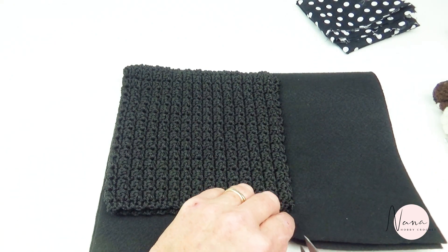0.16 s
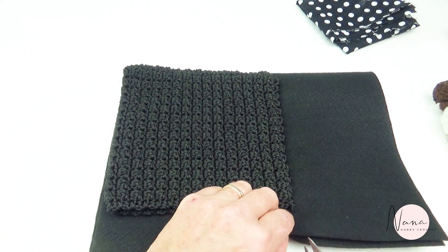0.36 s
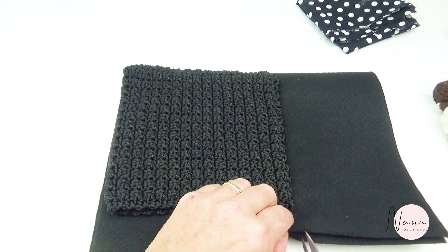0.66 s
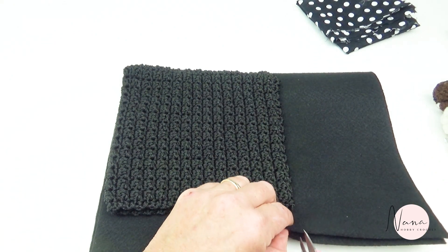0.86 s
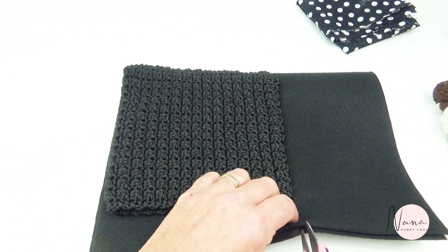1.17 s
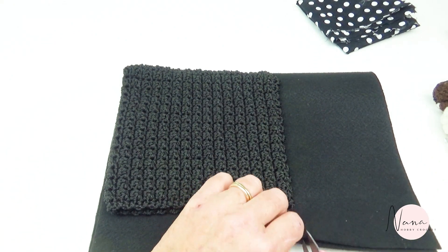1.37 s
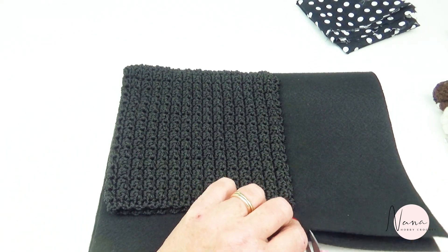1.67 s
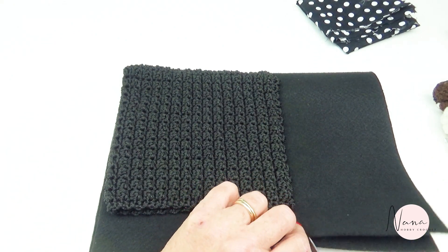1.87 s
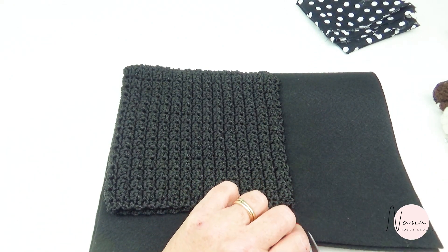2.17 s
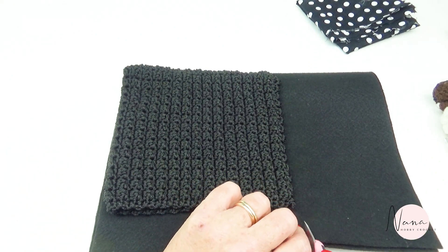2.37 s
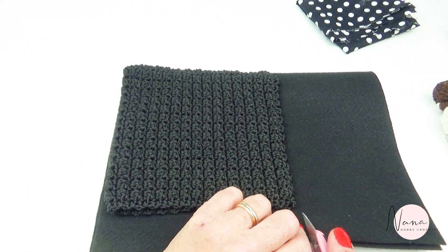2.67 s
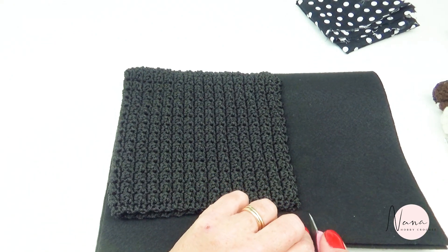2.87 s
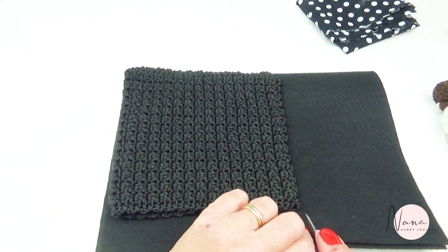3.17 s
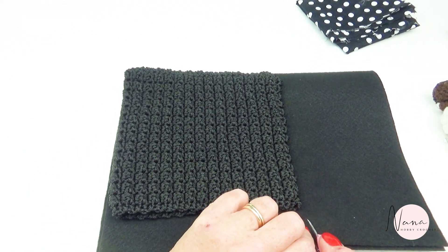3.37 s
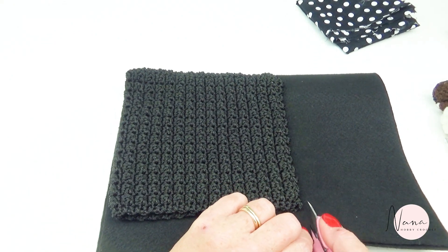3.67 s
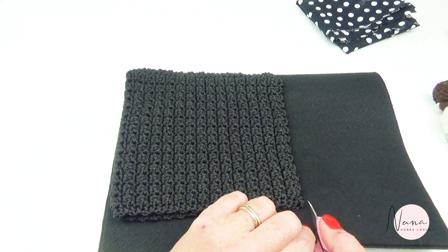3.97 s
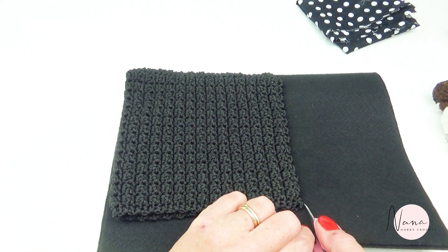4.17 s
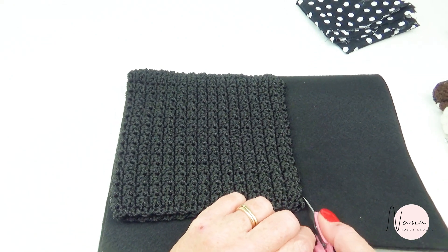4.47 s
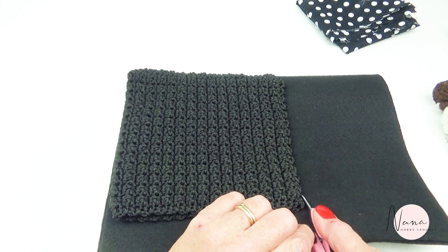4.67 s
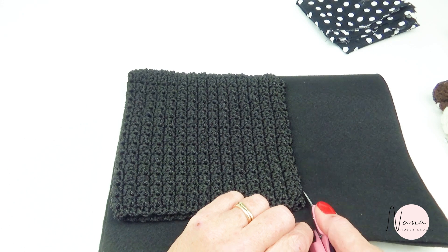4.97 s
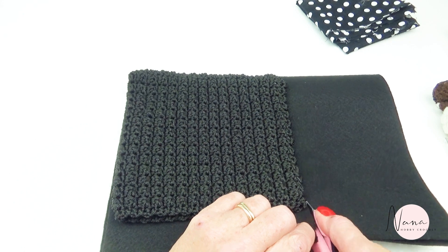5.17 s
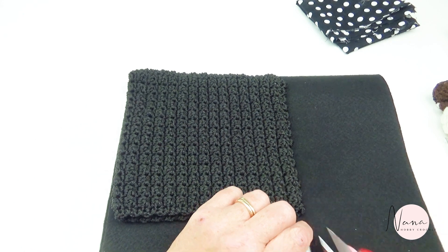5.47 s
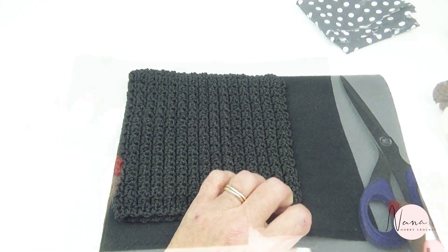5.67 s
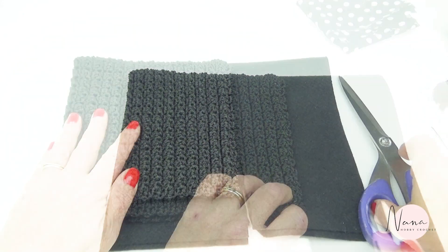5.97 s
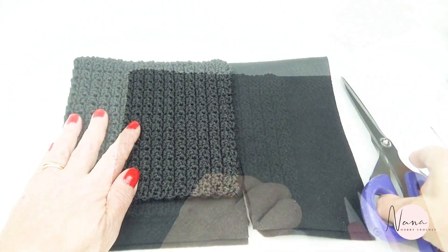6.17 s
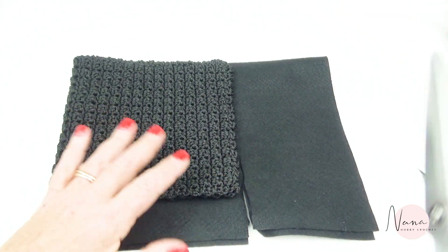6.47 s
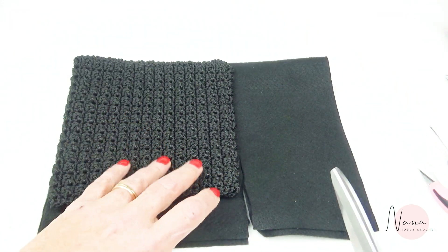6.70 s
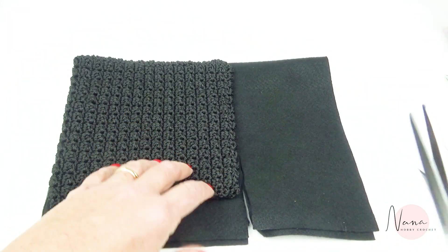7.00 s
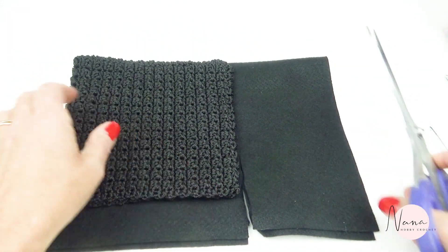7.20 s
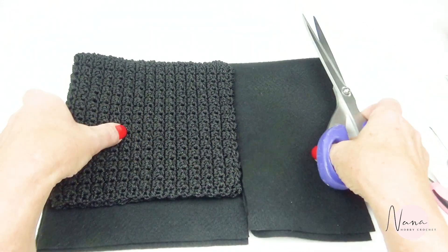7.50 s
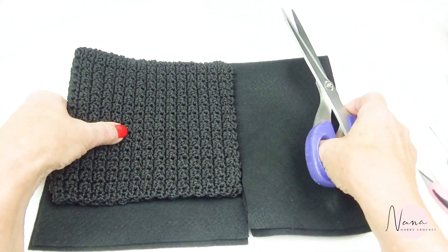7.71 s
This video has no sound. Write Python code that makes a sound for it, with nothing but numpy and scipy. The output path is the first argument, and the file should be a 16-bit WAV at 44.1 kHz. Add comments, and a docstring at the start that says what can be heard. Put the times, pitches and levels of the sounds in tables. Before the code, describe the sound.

Close to a small stereo microphone in a quiet room, scissor blades scrape and nibble faintly through doubled felt with light knocks on the table. Around three seconds the cuts turn loud and crisp, with separate bright metallic snaps until past five. Then only soft ticks, rustling cloth and low bumps remain, before the felt is dragged over the table with a cluster of dull knocks.

```python
"""First a scrape of scissor blades and a light knock on a craft table, close to a small stereo microphone
in a quiet room. Scissors nibble through doubled felt: bursts of snapping fibres ring the blade modes and
strokes rasp along the edge, while blades grind, cloth rustles, and hands and tools knock on the table.
Later the felt drags over the table top in two passes. Sources are shaped noise driving damped resonances,
over a low murmur, mains hum made of sines, a short echo and room tone."""
import sys
import numpy as np
from scipy import signal
from scipy.fft import rfft, irfft, next_fast_len
from scipy.io import wavfile
from scipy.ndimage import uniform_filter1d

SR = 44100
rng = np.random.default_rng(int(sys.argv[2]) if len(sys.argv) > 2 else 0)


def wav_out(sig):
    """Save sig, one row per channel (or a flat mono array), as 16-bit PCM at SR to the path in sys.argv[1]."""
    wavfile.write(sys.argv[1], SR, np.round(np.clip(np.atleast_2d(sig).T, -1, 1) * 32767).astype(np.int16))


N = 345964  # samples

# resonances of the scissors: (frequency [Hz], width before broadening [Hz])
BLADE_MODES = [(1150, 280), (1800, 550), (2550, 250), (2850, 220), (3250, 300), (3700, 400), (4250, 240),
               (4580, 330), (5150, 400), (6000, 550), (6900, 500), (7800, 600), (8650, 450), (9800, 1200),
               (12000, 3000)]
# level of each scissors mode when scraped: [dB]
SCRAPED_DB = [-6, -9.5, -7, -4, -9, -9.5, -2.5, -5.5, -9, -10, -12.5, -15, -10.5, -19, -29]
# where the scissors are: (time [s], left minus right [dB])
SCISSORS_SIDE = [(0, -2), (2.6, -1.6), (3.3, -0.8), (4.8, -1.2), (5.5, -2.5), (6.1, -3), (7.84, -6)]
# scraping strokes through the cloth: (start [s], length [s], level of the middle modes [dB])
CUT_STROKES = [(0, 0.065, -64.5), (0.225, 0.07, -58), (0.509, 0.16, -68), (0.687, 0.028, -59),
               (0.87, 0.037, -67), (0.937, 0.088, -63.5), (1.474, 0.05, -58.5), (1.716, 0.076, -67),
               (1.792, 0.042, -60.5), (1.882, 0.087, -68), (1.956, 0.037, -52), (2.167, 0.053, -63.6),
               (2.254, 0.044, -68.5), (2.429, 0.18, -65.5), (2.751, 0.2, -67), (3.057, 0.11, -79),
               (3.171, 0.047, -70), (3.48, 0.032, -41), (3.574, 0.13, -56.5), (3.859, 0.067, -67.5),
               (4.137, 0.081, -55), (4.463, 0.038, -53.5), (4.628, 0.071, -60), (4.772, 0.07, -64),
               (4.981, 0.15, -65), (5.498, 0.0282, -65), (5.596, 0.04, -59), (5.636, 0.077, -61.5),
               (5.722, 0.13, -66.5), (6.08, 0.059, -64.5), (6.159, 0.057, -69), (6.305, 0.02, -68.5),
               (6.401, 0.05, -73), (6.596, 0.043, -74.5), (6.657, 0.1, -79.5), (6.823, 0.066, -62),
               (6.898, 0.036, -71), (7.037, 0.039, -73)]
# resonances of the table top: (frequency [Hz], width before broadening [Hz], relative level [dB])
TABLE_MODES = [(138, 41, -9), (321, 79, -5), (431, 45, 1.5), (518, 38, 2.5), (616, 55, 0), (785, 134, -1),
               (1053, 430, 1), (1286, 470, 4), (1980, 620, -6.5), (224, 18, -5)]


def undb(db):
    """Decibels to gain."""
    return 10 ** (np.asarray(db) / 20)


def level(x, db):
    """Scale to an rms level."""
    return x * undb(db) / np.sqrt(np.mean(x ** 2))


def ring(x, hz, width_hz, gain, order=1):
    """Pass a signal through damped resonances of alternating sign; order 2 keeps the valleys dark."""
    size = next_fast_len(len(x), real=True)
    f = np.fft.rfftfreq(size, 1 / SR)[1:]
    response = 0
    for k, (centre, width, g) in enumerate(zip(hz, width_hz, gain)):
        detuning = (f ** 2 - centre ** 2) / (f * width)
        response = response + (-1) ** k * g / (1 + 1j * detuning) ** order
    return irfft(rfft(x, size) * np.append(0, response), size)[:len(x)]


def colour(x, points):
    """Shape noise by (Hz, gain) points."""
    hz, gain = np.transpose(points)
    size = next_fast_len(len(x), real=True)
    f = np.fft.rfftfreq(size, 1 / SR)
    response = np.interp(np.log(f + 1), np.log(hz), gain)
    return irfft(rfft(x, size) * response, size)[:len(x)]


def curve(table):
    """Columns of a level table, one value a sample; -150 dB outside it."""
    times, *columns = np.transpose(table)
    return [np.interp(np.arange(N) / SR, times, c, left=-150, right=-150) for c in columns]


def at(table, s):
    """Columns of a control table at one moment."""
    times, *columns = np.transpose(table)
    return np.array([np.interp(s, times, c) for c in columns])


def grit(size, scatter_db):
    """Noise whose samples differ widely in size: many faint slips, a few sharp ones."""
    boost_db = scatter_db * np.minimum(rng.exponential(size=size), 5)
    return rng.standard_normal(size) * undb(boost_db)


def walk(rate):
    """Random wander around 0, taking about rate new values a second."""
    k = int(SR / rate)
    steps = np.repeat(rng.standard_normal(N // k + 1), k)
    return uniform_filter1d(steps, k)[:N]


def sides(pan_db):
    """Left and right level offsets in dB for a left-minus-right difference."""
    return np.array([[pan_db], [-pan_db]]) / 2


def add(out, s, sound, peak_db, pan_db):
    """Place a sound with its peak level and side."""
    i = int(s * SR)
    part = sound[:N - i] * undb(peak_db) / np.abs(sound).max()
    out[:, i:i + len(part)] += part * undb(sides(pan_db))


def push(rise_ms, size):
    """Force that swells for rise_ms and dies away."""
    u = np.arange(size) / SR / (rise_ms / 1000)
    return u * np.exp(1 - u)


def near(hz, centre_hz, boost_db, octaves):
    """Favour the modes around one pitch."""
    return boost_db * np.exp(-(np.log2(hz / centre_hz) / octaves) ** 2)


def gate(s, length_s, edge_s, part=slice(None)):
    """Smooth on and off, one value a sample."""
    t = np.arange(N)[part] / SR
    inside_s = np.minimum(t - s, s + length_s - t)
    return np.sin(np.pi / 2 * np.clip(inside_s / edge_s + .5, 0, 1)) ** 2


def snips():
    """Snaps ring the blades; each burst favours one ring pitch, with a little random scatter of the modes."""
    # bursts that ring the blades: mostly snapping fibres, some where the scissors touch the table or clack
    # together: # (time [s], peak before the bass cut [dB], favoured ring [Hz], treble before a shared offset
    # [dB], # swell before scaling [ms], fade before scaling [ms])
    bursts = [(0.2276, -43.5, 4360, -6, 2.8, 3.0), (0.2808, -39.5, 4530, -7, 2, 11),
              (0.4077, -48, 2450, -10, 2.7, 2.9), (0.511, -49, 4300, -23, 2.2, 2.9),
              (0.733, -37.5, 8900, -9.5, 0.84, 1.9), (0.7402, -39.5, 2900, -8, 3.4, 6.7),
              (0.8505, -40.5, 3020, -20, 1.1, 3.9), (0.971, -45, 4520, -19, 2.9, 5.5),
              (1.069, -47.5, 4350, -5, 1.5, 5.0), (1.1352, -43.5, 2560, -19, 3.6, 5),
              (1.193, -39.5, 4460, -3.5, 1.3, 8.1), (1.2818, -48, 2560, -23, 1.2, 2),
              (1.5085, -44, 4840, -9, 7.8, 14), (1.942, -41.5, 4420, -9, 1.5, 4.5),
              (1.9858, -32.5, 4420, -3, 1.4, 1.2), (2.2036, -39, 3700, -9, 1.1, 2.3),
              (2.2097, -43, 3810, -12, 1.5, 3.8), (2.3096, -41.5, 3060, -22, 2.3, 11),
              (2.509, -38, 4230, -6, 1.9, 3.7), (2.6262, -42.5, 4330, -7, 1.55, 1.6),
              (2.8304, -35.5, 5800, -10, 1.4, 0.74), (2.862, -37, 2820, 0, 0.83, 1.1),
              (2.867, -32.5, 2900, -10, 1.1, 1), (2.8778, -36.5, 2700, -1, 1.1, 1.4),
              (2.8865, -43, 2950, -6, 5.4, 3.5), (2.899, -41.5, 2860, -11, 2.2, 2.7),
              (2.9132, -19, 2710, -1, 2.3, 0.39), (2.928, -36, 8600, -8, 2.8, 1.8),
              (2.947, -46.5, 2650, -15, 2.1, 2.8), (2.98, -44.5, 2630, -9, 3.8, 2.7),
              (3.224, -47, 2650, -3, 1.5, 1.6), (3.2728, -12, 5900, -18, 1.1, 6),
              (3.2771, -9.5, 3000, -10, 4.2, 1.7), (3.3085, -6, 6400, -6.5, 2.7, 5.9),
              (3.4913, -13, 5380, -22, 2.9, 3), (3.497, -16.5, 3000, -25, 2, 4),
              (3.5107, -12, 3900, -11, 8.1, 0.88), (3.5717, -43, 4300, -6, 1.4, 1.1),
              (3.5787, -27.5, 4230, -1, 2.2, 0.57), (3.606, -30, 3980, -3, 0.65, 1.4),
              (3.616, -29.5, 4200, 0, 2.3, 2.1), (3.633, -25.5, 5770, -5, 1.4, 1),
              (3.6417, -25.5, 2510, -0.5, 0.43, 1.3), (3.7678, -44, 4440, -4, 0.78, 1.4),
              (3.834, -44.5, 4400, -20, 1.5, 2.1), (3.8723, -41, 3650, -6, 1.3, 1.3),
              (3.882, -42.5, 3610, -5, 4.9, 12), (4.1486, -25.5, 4410, -18, 1.9, 1.6),
              (4.1658, -30, 4030, -10, 8, 2.2), (4.1788, -34, 3900, -14, 1.8, 2),
              (4.186, -27.5, 3970, -21, 3.7, 3.6), (4.2008, -23.8, 5500, -8.5, 2.9, 3.5),
              (4.2338, -25.5, 2540, -22, 7.7, 3.9), (4.252, -33.2, 2480, -12, 1.6, 6.4),
              (4.263, -21, 3630, -17, 4.7, 4.1), (4.2887, -29, 5930, -19, 1, 1.5),
              (4.2928, -14.5, 6000, -11, 1.7, 3.6), (4.295, -8.5, 3020, -16.5, 3.1, 3.2),
              (4.3131, -14.5, 4930, -4.5, 1.3, 2.6), (4.4629, -32.5, 4470, -19, 1.6, 1.7),
              (4.49, -26.5, 4140, -25, 7.7, 2.2), (4.4963, -23, 2630, -28, 2.04, 2),
              (4.636, -33, 4520, -21, 1.2, 1.6), (4.6602, -29, 4470, -11, 2.2, 1.2),
              (4.6826, -41, 3950, -19, 2.4, 3.5), (4.7766, -26, 5730, -12.5, 9.1, 0.91),
              (4.805, -42, 5940, -10, 8, 1.6), (4.8197, -8.5, 3350, -6.5, 3.9, 1.1),
              (5.0129, -44, 2490, -20, 9.3, 13), (5.0973, -38, 2460, -22, 1.7, 1.4),
              (5.22, -35.5, 6200, -6, 2.7, 7.4), (5.2305, -6.5, 3280, -5.5, 1.95, 3.8),
              (5.2489, -33.5, 3220, -16, 4.7, 68), (5.3744, -42, 5750, -18.5, 1, 3.2),
              (5.3858, -22, 2600, -2.5, 0.98, 5), (5.392, -17, 8000, -2, 1.5, 1.5),
              (5.3948, -7.5, 4370, -9, 2, 3.7), (5.4023, -4, 4240, -14.5, 2.4, 3.8),
              (5.5062, -44.5, 4930, -16, 1.7, 7.6), (5.6176, -42.5, 2920, -24, 3.9, 12),
              (5.828, -49, 4000, -6, 7, 3.4), (5.955, -44.5, 4070, -26, 1.3, 3.8),
              (6.125, -42, 2860, 1, 6.4, 3.7), (6.1796, -44, 5300, -17, 2.6, 10),
              (6.2477, -45.5, 2900, -21, 7.9, 6.6), (6.615, -44, 5940, -2, 5.2, 7.9),
              (6.835, -40, 2540, 0, 6.9, 11), (6.8583, -41, 6900, -20, 5.5, 11),
              (7.059, -46, 6930, -7, 5.5, 8.8), (7.1584, -32.5, 4900, 0, 1.5, 6),
              (7.1699, -18, 3480, -6, 2.37, 6.6), (7.294, -50.5, 8600, -1, 1.4, 5.8)]
    # level of each scissors mode when fibres snap: [dB]
    snapped_db = [-24.5, -18.5, -0.5, 0, -1.5, -0.5, 1, -1, -1.5, -2.5, -5, -10, -10.5, -19.5, -31.5]
    out, (hz, width) = np.zeros((2, N)), np.transpose(BLADE_MODES)
    size, centre, pan_scatter_db = 3072, 882, 1.35  # samples, sample of the peak force
    ms = (np.arange(size) - centre) / SR * 1000
    for s, peak_db, ring_hz, treble_db, swell_ms, fade_ms in bursts + ticks():
        pan_db = at(SCISSORS_SIDE, s)[0] + pan_scatter_db * rng.standard_normal()
        # faint ticks sound like the scraped blades, louder snaps move to the snapped mix
        hard = np.clip((peak_db + 46) / 20, 0, 1)
        db = hard * np.array(snapped_db) + (1 - hard) * np.array(SCRAPED_DB)
        db = db + near(hz, ring_hz, boost_db=8, octaves=.2) + 1.5 * rng.standard_normal(len(hz))
        db = db + (hz > 7400) * (treble_db + 13)
        swell = np.exp(-(ms / (0.72 * swell_ms)) ** 2)
        fade = np.exp(-np.abs(ms) / max(0.63 * fade_ms, .3))
        force = np.where(ms < 0, swell, fade)
        # fibres strain and crackle faintly before they part
        strain = (ms < 0) * undb(-25.5) * np.exp(-np.abs(ms) / 6)
        snaps = np.maximum(force, strain) * grit(size, scatter_db=4)
        add(out, s - .0205, ring(snaps, hz, 1.39 * width, undb(db)), peak_db, pan_db)
    # the slim blades radiate no bass
    return signal.sosfilt(signal.butter(2, 900, "high", fs=SR, output="sos"), out)


def ticks():
    """Stray fibres part at random moments of a stroke, above its level; rows as for the bursts."""
    per_s = 18  # rounded to whole ticks a stroke
    rows = []
    for s, length_s, db in CUT_STROKES:
        chance = rng.random((8, 3))
        for place, size, pitch in chance[:int(round(per_s * length_s))]:
            peak_db = db + 11 - 2 * np.log(size + 0.014)
            ring_hz = 4280 * (.65 + .5 * pitch)
            rows.append((max(s + place * length_s, .021), peak_db, ring_hz, -5, 1.74, 1.74))
    return rows


def strokes():
    """A steady stream of fibres parts along the edge; groups of blade modes change in level over time."""
    # colour of the strokes, above the middle modes:
    # (time [s], low modes [dB], high modes [dB], handles [dB])
    stroke_colour = [(0, -4.5, -10, -1.5), (1.0, -5, -4.5, -8.5), (2.0, -9, -8, -11), (2.8, 4.5, 6, 0.5),
                     (3.15, 6, 1.5, -8.5), (3.5, 0, -3.5, -14), (3.8, 1, 6.5, 3), (4.2, 3, -12, -27),
                     (5.3, 2, -2.5, 0.5), (5.7, 0, -2, -25.5), (6.6, 3, 12.5, 1), (7.1, -13, 4, 0)]
    (hz, width), gain = np.transpose(BLADE_MODES), undb(SCRAPED_DB)
    fibres = grit(N, scatter_db=3.5) * undb(2 * walk(120))
    middle, low = (hz > 4000) & (hz < 5000), (hz > 2200) & (hz < 4000)
    high, handles = hz > 5000, hz < 2200
    modes = [level(ring(fibres, hz[g], 1.4 * width[g], gain[g], order=2), 0)
             for g in (middle, low, high, handles)]
    out = np.zeros((2, N))
    for s, length_s, middle_db in CUT_STROKES:
        above_db, pan_db = at(stroke_colour, s), at(SCISSORS_SIDE, s)[0]
        part = slice(max(int((s - .02) * SR), 0), int((s + length_s + .02) * SR))
        rasp = sum(undb(db) * mode[part] for db, mode in zip([0, *above_db], modes))
        rasp = rasp * gate(s, length_s, edge_s=.014, part=part)
        out[:, part] += rasp * undb(middle_db + sides(pan_db))
    return out


def hands():
    """Edge grinds on edge in uneven slips; wool and felt rustle in fine crackles."""
    # hands at work: (time [s], blades grinding [dB], cloth rustle [dB])
    hand_levels = [(0.0, -67, -70), (0.8, -68, -91), (1.3, -68, -69), (1.5, -73, -71), (1.72, -97, -75),
                   (2.3, -84, -78), (2.51, -66, -62), (2.66, -78, -66.5), (2.85, -93, -60.5),
                   (3.1, -84, -70), (3.7, -67, -66.5), (3.93, -94, -68), (4.26, -57, -67), (4.4, -73, -79),
                   (4.56, -58.5, -60), (4.8, -79, -68), (5.1, -73, -66), (5.48, -60.5, -58.5),
                   (5.63, -74, -79.5), (5.76, -74.5, -68), (6.1, -77, -69), (6.44, -86, -68),
                   (7.4, -88.5, -63.5), (7.64, -65, -55.5), (7.84, -77, -62)]
    # colour of the rustle: (frequency [Hz], relative level [dB per Hz])
    cloth_colour = [(1500, -16), (3000, -1.5), (5000, -4.5), (6500, -3.5), (9000, -5.5), (11000, -14.5),
                    (15000, -40)]
    grind_db, rustle_db = curve(hand_levels)
    hz, width = np.transpose(BLADE_MODES)
    slips, crackles = (grit(N, scatter_db=3.5) * undb(2.5 * walk(60)) for _ in range(2))
    grind = ring(slips, hz, 1.4 * width, undb(SCRAPED_DB), order=2)
    rustle = colour(crackles, [(f, undb(db)) for f, db in cloth_colour])
    return level(grind, 0) * undb(grind_db) + level(rustle, 0) * undb(rustle_db)


def knocks():
    """A short rough contact rings the table top; each knock has its own low and upper ring and brightness."""
    # knocks and bumps of scissors and knuckles: (time [s], peak [dB], low ring [Hz], upper ring [Hz],
    # upper modes [dB], left minus right [dB])
    table_knocks = [(0.037, -39.5, 426, 796, -7.5, 7), (0.408, -37.5, 434, 810, -6, 5),
                    (0.479, -49, 643, 1470, -5, 4), (0.699, -54, 425, 710, -8, 6),
                    (1.126, -44.5, 560, 1920, 1, -5), (1.133, -40, 347, 1270, -7, 4),
                    (1.235, -45, 517, 1710, -1, 2), (1.284, -42, 447, 730, -9.5, 0.0),
                    (1.4, -54, 400, 1150, 2, 0), (1.698, -54.5, 369, 1150, 2, -0.5),
                    (2.161, -37.5, 500.4, 1840, 1, 3), (2.315, -36.5, 407, 760, -5.5, 7),
                    (3.272, -27, 490, 1800, -1, 0.5), (3.509, -51, 446, 1620, -18, -1),
                    (4.293, -29.5, 362, 1888, -2, 1), (4.816, -33, 534, 1240, -5, 1),
                    (5.228, -33, 605, 1930, -0.5, 2), (6.246, -39, 360, 886, -11, -1.0),
                    (7.167, -46.5, 307, 1380, -8.5, -2), (7.253, -46.5, 334, 1330, -11, -5),
                    (7.313, -52, 446, 750, -18, -1.0), (7.379, -49.5, 410, 1570, -20, -2),
                    (7.409, -47, 610, 703, -7, 4), (7.425, -44.5, 460, 1030, -34, 1),
                    (7.488, -35, 422, 720, -25, -1), (7.51, -32.5, 430, 790, -8, 2.5),
                    (7.643, -35, 470, 766, -16, 1.0), (7.683, -24.5, 575, 1000, -10.5, 3),
                    (7.699, -33.5, 510, 850, -9, 3), (7.729, -44.5, 537, 915, -18, 0.5)]
    contact_ms, size = 3.36, 6144  # rise of the force, samples
    out, (hz, width, mode_db) = np.zeros((2, N)), np.transpose(TABLE_MODES)
    for s, peak_db, low_hz, upper_hz, upper_db, pan_db in table_knocks:
        db = mode_db + near(hz, low_hz, boost_db=15.5, octaves=0.29)
        db = db + near(hz, upper_hz, boost_db=15.7, octaves=0.31)
        db = db + 0.28 * rng.standard_normal(len(hz))
        # the brightest knocks also hold back the low modes
        low_db = 1.9 * np.minimum(-upper_db - 9, 0)
        db = db + np.where(hz > 700, upper_db, low_db)
        blow = push(contact_ms, size) * grit(size, scatter_db=5)
        add(out, s - .003, ring(blow, hz, 1.41 * width, undb(db), order=2), peak_db, pan_db)
    return out


def drag():
    """Felt judders over the table top in soft lumps and shakes its modes; a hiss rides above."""
    # passes of felt and palms over the table, each a list of
    # (time [s], judder before a 0.1 dB lift [dB], hiss before a 1.9 dB lift [dB])
    passes = [
        [(5.7, -81, -79), (5.924, -72, -102), (6.112, -74.5, -71.5), (6.452, -76, -81), (6.84, -73, -68),
         (7.0, -70, -79.5)],
        [(7.2, -98, -87), (7.304, -58, -77), (7.474, -51.5, -64), (7.562, -54.5, -61), (7.742, -59, -65),
         (7.84, -64, -65)],
    ]
    hz, width, mode_db = np.transpose(TABLE_MODES[1:])  # the lowest mode stays out
    lumps = rng.standard_normal(N) * undb(4 * walk(40))
    judder = level(ring(lumps, hz, 2.54 * width, undb(mode_db - hz / 90), order=2), .1)
    hiss = level(ring(rng.standard_normal(N), [900, 1700], [700, 1200], [1, 1]), 1.9)
    return sum(judder * undb(low_db) + hiss * undb(hiss_db) for low_db, hiss_db in map(curve, passes))


def squeak():
    """A short faint breathy rubbing squeak with its octave: noise through two narrow resonances."""
    start_s, length_s, pitch_hz = 5.965, 0.12, 847
    tone = ring(rng.standard_normal(N), [pitch_hz, 2 * pitch_hz], [40, 130], [1, .9])
    return level(tone, -62) * gate(start_s, length_s, edge_s=.03)


def murmur():
    """Low resonances murmur on and swell with every soft bump of hands and scissors on the table."""
    # murmur between the bumps: (time [s], boom [dB], rumble [dB])
    steady = [(0, -85, -67), (0.6, -83, -83), (2.2, -90, -86), (2.7, -89.5, -70), (3.2, -84, -81.5),
              (3.6, -89.5, -78), (4.0, -92, -90), (4.4, -88, -80.5), (5.6, -87.5, -80), (6.2, -82, -68),
              (6.85, -88.5, -73), (7.1, -91, -86), (7.84, -89, -81)]
    # added swell of each bump: (time of the peak [s], boom [dB], rumble [dB])
    soft_bumps = [(0.03, -77, -81), (1.135, -78, -81), (1.33, -76, -63.5), (1.44, -85, -84),
                  (2.36, -78, -81), (2.99, -78, -78), (3.33, -69, -78), (3.54, -77, -80), (4.33, -73, -75),
                  (4.68, -72, -75), (4.85, -65, -67), (5.26, -65, -90), (5.43, -81, -91), (5.875, -69, -72),
                  (6.029, -67, -68), (6.265, -62, -60), (7.385, -66, -57), (7.47, -62.5, -60.5),
                  (7.54, -63, -57.5), (7.69, -60, -53)]
    rise_ms = 13.2
    gains = undb(curve(steady))
    swell = push(rise_ms, size=SR // 3)
    for s, *db in soft_bumps:
        i = max(int((s - rise_ms / 1000) * SR), 0)
        gains[:, i:i + len(swell)] += undb(db)[:, None] * swell[:N - i]
    bands = (127, 21), (323.6, 107), (79, 45)  # boom, rumble, thud: (Hz, width Hz)
    boom, rumble, thud = (level(ring(rng.standard_normal(N), [f], [w], [1], order=2), 0) for f, w in bands)
    return (boom + undb(-15.5) * thud) * gains[0] + rumble * gains[1]


def mains():
    """Two slightly wavering harmonics of the mains."""
    # hum before its random wander: (time [s], second harmonic [dB], third harmonic [dB])
    harmonics = [(0, -73, -81), (.6, -90, -88), (2.35, -88.5, -93), (2.45, -100, -89), (7.84, -100, -83.5)]
    mains_hz = 59.6 * (1 + 0.0059 * walk(8.7))
    turn = 2 * np.pi * np.cumsum(mains_hz) / SR
    second_db, third_db = curve(harmonics)
    second = undb(second_db + 1.5 * walk(9)) * np.sin(2 * turn)
    third = undb(third_db + 1.5 * walk(9)) * np.sin(3 * turn)
    return np.sqrt(2) * (second + third)  # levels are rms


def echo(x):
    """Small soft room: a decaying noise response whose treble dies first."""
    t60_s, treble_t60_s, echo_db, side_db = 0.16, 0.072, -15, -5
    t = np.arange(SR // 2) / SR
    answers = []
    for _ in range(2):
        noise = rng.standard_normal(len(t))
        low = signal.sosfilt(signal.butter(1, 7000, fs=SR, output="sos"), noise)
        tail = low * undb(-60 * t / t60_s) + (noise - low) * undb(-60 * t / treble_t60_s)
        tail = tail * (1 - np.exp(-t / 0.0036))  # soft onset
        answers.append(signal.fftconvolve(x, tail / np.sqrt(np.sum(tail ** 2)))[:N])
    # long waves reach both microphone ports alike
    spread = signal.sosfilt(signal.butter(2, [350, 9000], "band", fs=SR, output="sos"), answers[1])
    mid, side = answers[0], undb(side_db) * spread
    return undb(echo_db) * np.array([mid + side, mid - side])


def room_tone():
    """Diffuse noise of room and microphone, partly alike left and right, and a far low drone."""
    # colour of the noise: (frequency [Hz], relative level [dB per Hz])
    tone_colour = [(15, -77), (25, -34.5), (49, -19), (87, -34.5), (114, -18), (149, -19), (166, -4),
                   (293, -6), (575, -2), (936, -1), (1790, -4.5), (2160, -4), (2840, -8), (7710, -14),
                   (16000, -18)]
    # (frequency [Hz], likeness of left and right [0-1])
    likeness = [(130, 1), (290, 0.6), (640, 0.09), (1400, 0), (3100, 0), (6800, 0.46), (15000, 1)]
    # distant traffic: (frequency [Hz], width [Hz], level [dB])
    traffic = [(54.6, 13, -97.5)]
    tone = [(f, undb(db)) for f, db in tone_colour]
    mid, side = (colour(rng.standard_normal(N), tone) for _ in range(2))
    mid = colour(mid, [(f, np.sqrt(1 + c)) for f, c in likeness])
    side = colour(side, [(f, np.sqrt(1 - c)) for f, c in likeness])
    drone = sum(level(ring(rng.standard_normal(N), [f], [w], [1]), db) for f, w, db in traffic)
    return level(np.array([mid + side, mid - side]), -64) + drone


def scene():
    """Snips, knocks and strokes with their echo over the rest; hands lean right, the drag slightly left."""
    hits = snips() + knocks() + strokes()
    handling = hands() * undb(sides(-1.2)) + drag() * undb(sides(0.34))
    centred = murmur() + mains() + squeak()
    return hits + echo(hits.mean(axis=0)) + handling + centred + room_tone()


def record(dry):
    """Steep low-pass at 16 kHz over the whole scene."""
    return signal.sosfilt(signal.ellip(10, .2, 70, 16000, fs=SR, output="sos"), dry)


dry = scene()
out = record(dry)
wav_out(out)
```